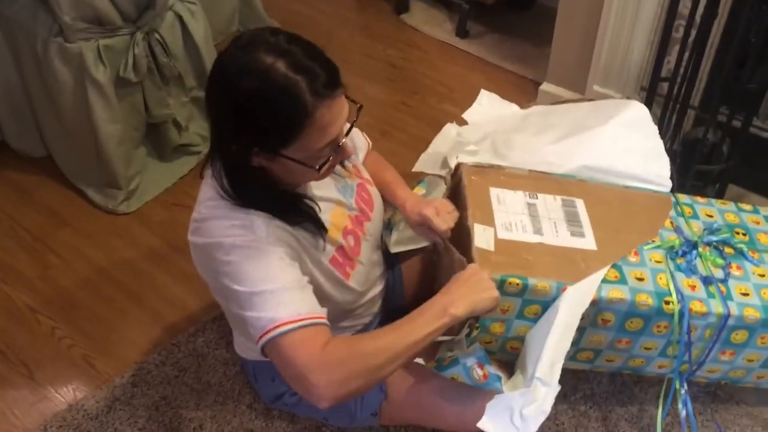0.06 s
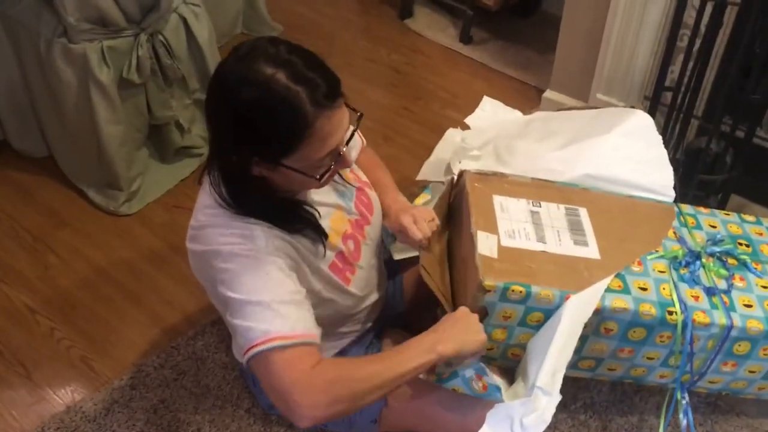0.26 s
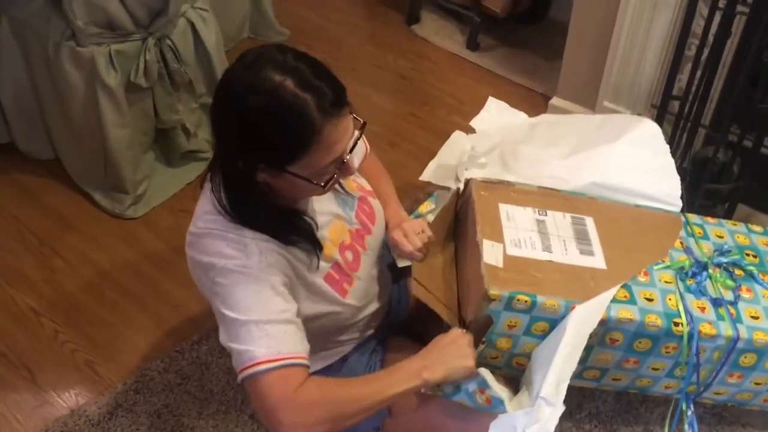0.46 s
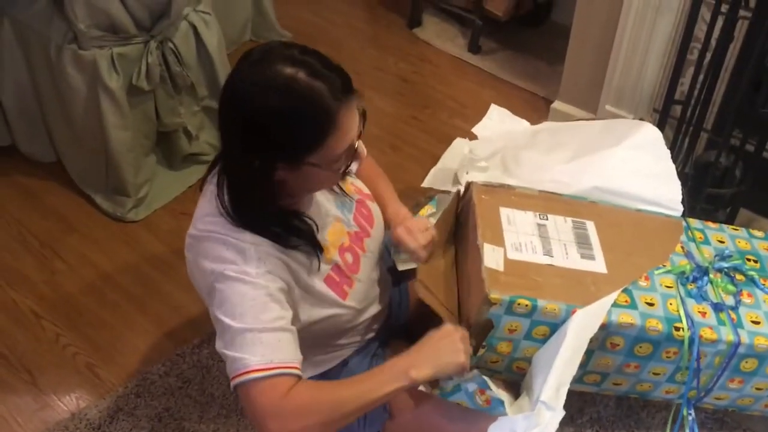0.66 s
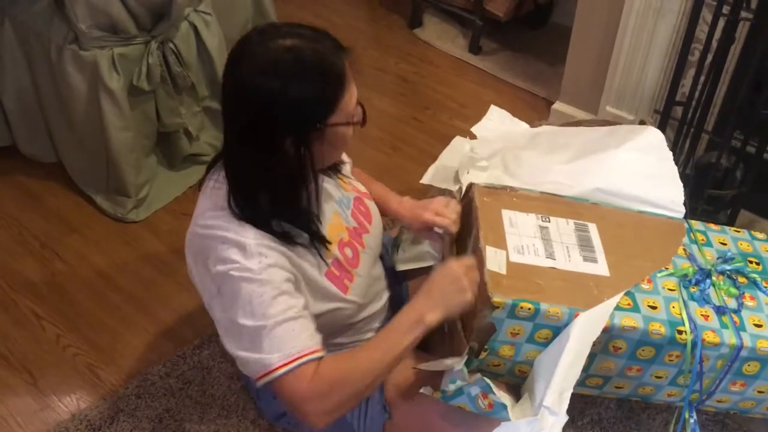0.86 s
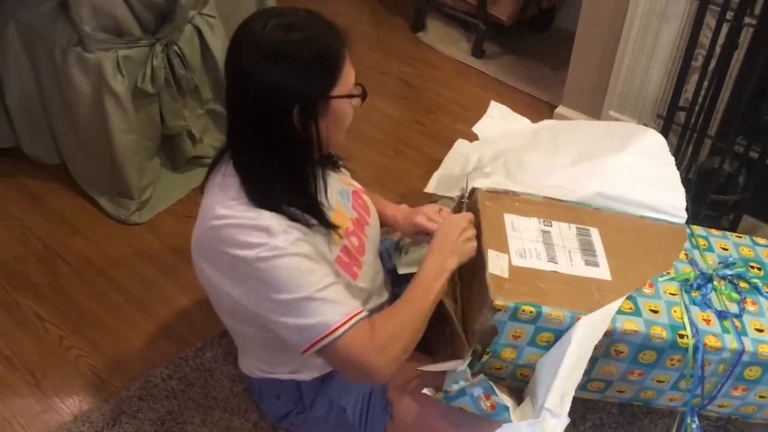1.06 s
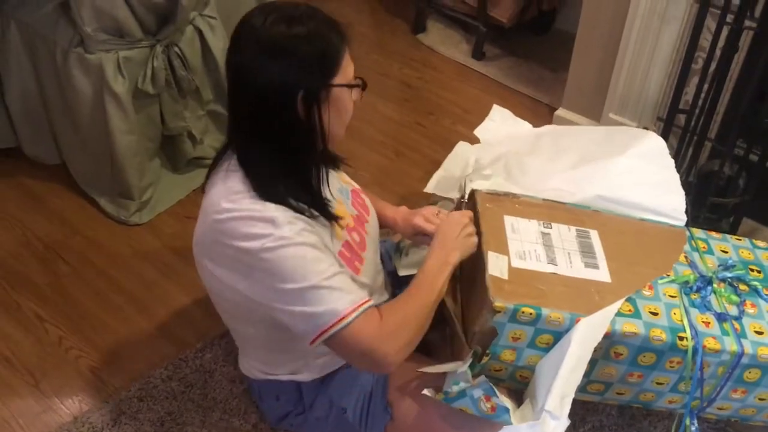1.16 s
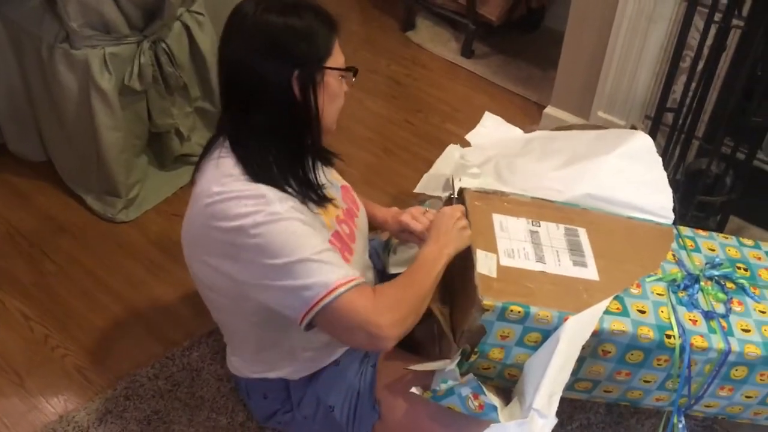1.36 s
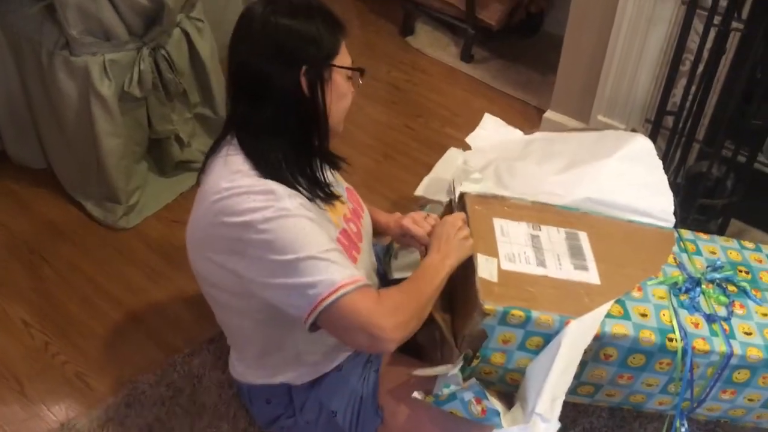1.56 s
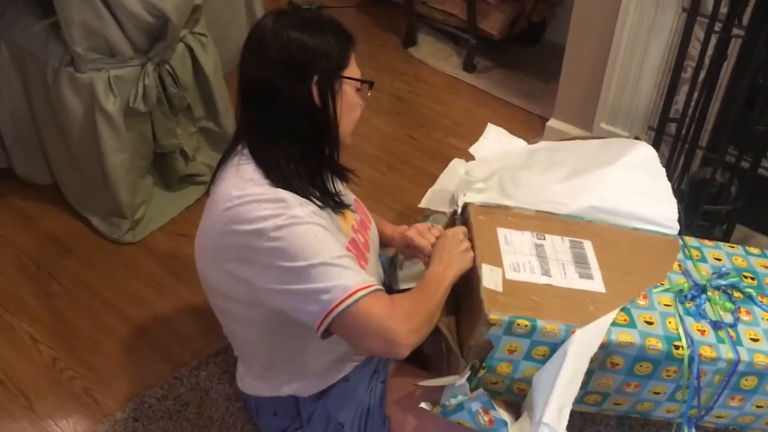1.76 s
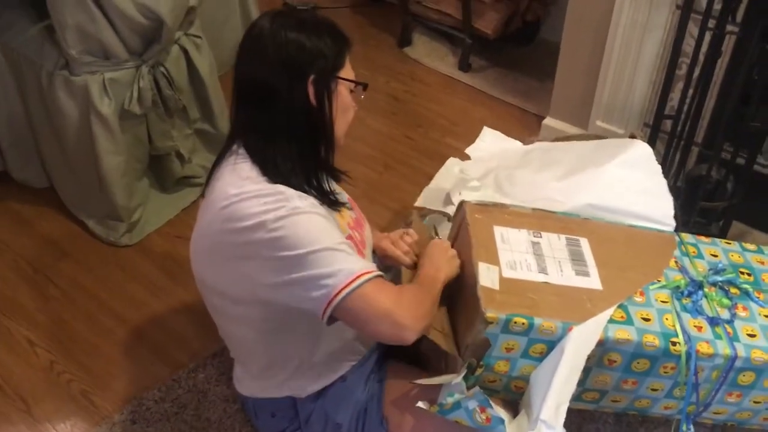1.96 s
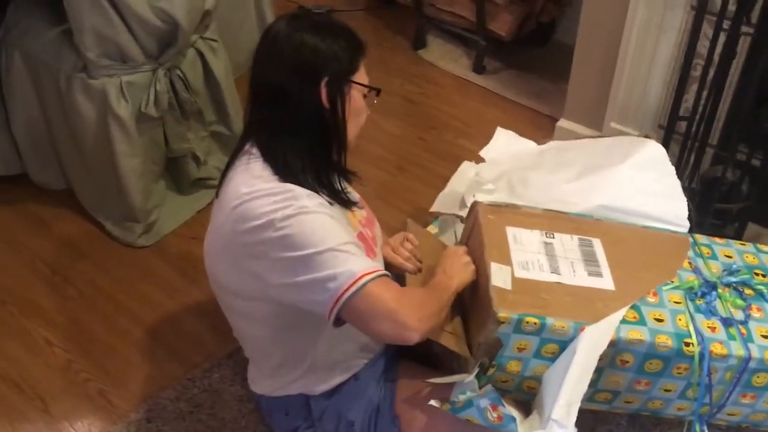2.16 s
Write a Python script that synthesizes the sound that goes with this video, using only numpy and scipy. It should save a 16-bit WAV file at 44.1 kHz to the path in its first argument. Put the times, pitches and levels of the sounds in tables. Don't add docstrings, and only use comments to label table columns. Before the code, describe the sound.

A cardboard box is pulled open indoors. Loud cracks and hollow thumps hit at 0.17-0.27 s, then a stiff flap snaps free at 0.45-0.54 s. Small paper ticks and crackles follow until 1.2 s. A hand slides faster over the board around 1.4-1.65 s, with a snap at 1.48 s. Cracks and softer knocks return at 1.83-1.93 s, then faint clicks over low hum and short room tail.

```python
import sys
import numpy as np
from scipy import signal
from scipy.fft import rfft, irfft, next_fast_len
from scipy.io import wavfile
from scipy.ndimage import uniform_filter1d, map_coordinates

SR = 44100
rng = np.random.default_rng(int(sys.argv[2]) if len(sys.argv) > 2 else 0)


def materialize(psi):
    bounded = np.clip(np.atleast_2d(psi).T, -1, 1)
    quanta = np.round(bounded * 32767).astype(np.int16)
    wavfile.write(sys.argv[1], SR, quanta)


def makeup_ratio(level_db):
    decades = np.asarray(level_db, float) / 20
    return 10 ** decades


N = 97020

# start in seconds, peak in dB, ringing pitch in Hz, broad part in dB, t60 in seconds.
CRACKS = [(.165, -13, 5500, 40, 0.021), (.1752, -6, 4000, 33, 0.031), (.1805, -26, 6540, 14, 0.016),
          (.1992, 0, 4520, 0, 0.026), (.2045, -3.5, 2950, 11, 0.0099), (.4532, -4, 3080, -1, 0.009),
          (.4598, -4.5, 5340, -2, 0.016), (.4655, -16, 3400, -26, 0.0067), (.5158, -11, 8000, -18, 0.01),
          (.5175, -6.5, 1070, -16.5, 0.013), (1.8715, -28, 4200, -3, 0.025), (.461, -17, 1120, -22, 0.036),
          (.522, -14, 2220, -12, 0.032), (.5398, -7.5, 3600, 0, 0.011), (1.4845, -4.5, 4560, -11.5, 0.0074),
          (1.4862, -6.5, 5050, -12, 0.01467), (1.4895, -27, 3700, -15, 0.017), (1.8272, -25, 4000, 7, 0.07),
          (1.8342, -5.5, 4580, -6, 0.028), (1.8503, -15, 2620, -6, 0.028), (1.862, -23, 3680, -31, 0.075),
          (1.9035, -18.5, 4770, -3, 0.061), (1.9165, -39, 5600, 5, .03)]
# start in seconds, peak in dB, ringing pitch in Hz, broad part in dB, t60 in seconds.
TICKS = [(0.028, -36, 3250, -22, 0.029), (.369, -26.5, 5440, 0, 0.012), (0.4196, -25, 9400, -11.5, 0.02),
         (0.5861, -21.5, 3800, -7, 0.013), (0.6867, -24, 1950, 18, 0.023), (0.714, -23.5, 6000, -9, .009),
         (0.7486, -25.5, 5650, -7, 0.013), (0.77, -24.5, 2010, 3, 0.011), (0.7799, -24, 6200, -13, 0.0042),
         (0.8186, -18.5, 4320, -16, 0.009), (0.8564, -28.5, 2930, -24, 0.018),
         (1.0462, -36.5, 3200, -7, 0.015), (1.0684, -31, 5470, -3, 0.034),
         (1.0732, -26.5, 2550, -20, 0.018), (1.127, -33, 4500, -10, .012), (1.17, -28, 1180, 3, 0.039),
         (1.1967, -24, 12800, -7, 0.012), (1.3657, -29.5, 6500, -8, 0.055), (0.9196, -32, 11800, 3, 0.0082),
         (1.687, -32.5, 6100, 1, .03)]
# start in seconds, peak in dB, ringing pitch in Hz, broad part in dB,
# t60 in seconds.
LATE_TICKS = [(1.7228, -27, 6000, -9, .01), (1.7512, -36, 6000, -6, .006),
              (1.7602, -30, 6000, -1, .007), (2.057, -31, 3000, -12, .01),
              (2.0612, -33, 5000, -14, .008), (2.1015, -32, 4500, -7, .008),
              (2.138, -33, 9000, -4, .006), (2.1533, -27, 4300, -5, .007),
              (2.1595, -30, 6000, -10, .02)]
# start in seconds, peak in dB, ringing pitch in Hz, broad
# part in dB, t60 in seconds.
CRACKLES = [(.0857, -36.5, 9000, -11, 0.0085), (0.292, -27, 11000, -6, .01),
            (0.4464, -24.5, 12000, 6, 0.0095), (.525, -25, 10000, -8, 0.014), (0.614, -27, 3670, -6, 0.01),
            (.7205, -34, 5980, -11, 0.0064), (.7755, -22, 6500, -3, 0.012), (.793, -35, 6200, -10, 0.0092),
            (.83, -32, 5000, -7, 0.0062), (0.841, -25.5, 8600, -17, 0.017), (.846, -28, 7000, -8, 0.0073),
            (0.8538, -23, 8500, -17, 0.0079), (.8605, -32.5, 13500, -6, 0.0063),
            (.864, -33, 6000, -13, 0.0043), (1.027, -45, 3000, -22, 0.01), (1.0302, -43, 3300, -16, 0.014),
            (1.041, -40.5, 3200, -11, 0.018), (1.064, -39, 6500, -6, 0.012),
            (1.0765, -33.5, 1520, -9, 0.024), (1.088, -35, 7000, -4, 0.0085),
            (1.124, -35, 6000, -14, 0.0097), (1.131, -37, 3400, -21, 0.013),
            (1.1368, -30, 4000, -5, 0.0072), (1.162, -34.5, 3980, -4, 0.0074),
            (1.1775, -23.5, 12000, -14, 0.0095), (1.184, -32.5, 6000, 7, 0.011),
            (1.2005, -27, 6940, -27, 0.016), (1.7522, -26.5, 10800, -21, 0.014),
            (1.7608, -29, 12200, -21, 0.0071), (1.978, -43, 11500, -14, 0.0058),
            (2.136, -31.5, 1720, -7, 0.0092), (1.8409, -6, 5000, 13, 0.0153)]
# frequency in Hz, gain in dB.
SNAP_TONE = [(150, -43.5), (450, -3), (800, 4), (3000, 6.5), (9000, 2.5), (15000, -4.5)]
RING_OCTAVES, LUMPS_DB = 0.3, 2.5
RISE_SHARE = 0.038
FIRST_FIBRE = 3

# time in seconds, level in dB, share of dull board scrape in dB.
RUB = [(0, -50.5, 1), (0.059, -59, -3.5), (.34, -56, 3.5), (.44, -53.5, -6), (0.556, -51.5, 5.5),
       (.66, -54.5, -6), (.76, -43.5, -20), (0.863, -45.5, -19), (.89, -54, -10), (1.01, -65, -4.5),
       (1.19, -58, -7), (1.353, -57.5, -5), (1.369, -50, -6.5), (1.461, -41, -5), (1.578, -38, -10),
       (1.68, -55.5, -11), (1.8, -61.5, -1.5), (1.885, -44.5, -3.5)]
# frequency in Hz, density in dB per Hz.
PAPER_TONE = [(300, -27), (600, -31), (1500, -10), (2300, -6), (4200, 0), (6000, 0), (10000, -1.5),
              (14500, -7)]
# frequency in Hz, density in dB per Hz.
BOARD_TONE = [(100, -2.5), (250, 8), (600, 4), (1500, 0), (2300, -2.5), (6000, -24)]
# frequency in Hz, density in dB per Hz.
SLOW_SLIDE_TONE = [(600, -33), (1500, -8), (2250, -13), (3100, -5.5), (5800, 0), (8500, -3), (11000, -19),
                   (14500, -7)]
# frequency in Hz, density in dB per Hz.
FAST_SLIDE_TONE = [(600, -35), (1500, -4.5), (2700, -5.5), (4400, 4), (5100, 1.5), (5900, 0), (9000, -4),
                   (15000, -14)]
SLIDE_FROM_S, SPEEDS_UP_S, SLIDE_TO_S, BLEND_S = 1.35, 1.48, 1.7, 0.022
GRAINS_PER_S, GRAIN_SPREAD_DB, GRAIN_DB = 1200, 3.5, -3
UNEVEN_DB = 1.3
RUB_FADE_S, RUB_FADE_DB_PER_S = 1.883, 93

# start in seconds, level in dB, pitch in Hz the struck spot favours.
KNOCKS = [(0.167, -27, 183), (0.178, -19, 260), (.2, -19.5, 505), (0.204, -18, 420), (0.221, -18, 141),
          (.252, -20.5, 167), (0.267, -30, 151), (0.496, -24.5, 132), (0.521, -34, 254), (1.171, -43, 205),
          (1.839, -38, 128), (1.846, -24.5, 223), (1.866, -25, 80), (1.917, -35.5, 129), (1.934, -40, 90)]
# frequency in Hz, level in dB, t60 in seconds.
BOX_MODES = [(61, 0.5, 0.041), (154.7, -11, 0.14), (212, -3.5, 0.062), (353, 2.5, 0.018),
             (565, -3.5, 0.057), (785, -1, 0.058), (997, 1, 0.036)]
SPOT_OCTAVES, PUSH_CYCLES = 0.97, 0.18

# start in seconds, level in dB.
FLAP_BLOWS = [
    (.4535, -21),
    (.4603, -15.5),
    (.4655, -27.5),
]
# frequency in Hz, level in dB, t60 in seconds.
FLAP_MODES = [(688.5, -10.5, 0.1), (1066, -12.5, 0.034), (1160, -17, 0.079), (1437, -4, 0.047),
              (2010, -4, 0.082), (2136, 4.5, 0.027), (2454, -6.5, 0.041), (3400, -2, .02)]
# start in seconds, level in dB, pitch in Hz, t60 in seconds.
THUMPS = [
    (.202, -14, 374, 0.049),
    (0.216, -26, 134, .1),
    (1.833, -29.5, 111.1, .06),
    (1.842, -33, 1000, 0.091),
    (1.875, -33, 306, 0.07),
]

# frequency in Hz, t60 in seconds.
ROOM_DECAY = [(150, 0.34), (1000, 0.3), (5000, 0.27), (14000, 0.24)]
ROOM_DB, PREDELAY_S = -7.5, 0.004
BOX_WET_DB, SCATTER_PER_S = -3, 300

# frequency in Hz, density in dB per Hz.
AIR_TONE = [(15, -31), (30, -37.5), (240, 7), (450, -9.5), (1800, -49), (3200, -4.5), (6000, -74),
            (15800, -11)]
AIR_DB = -60.5
# frequency in Hz, rms level in dB.
HUM = [(120, -70), (240, -62.5), (480, -73.5)]

# frequency in Hz, gain in dB.
MIC = [(22, -19.5), (52, 2.5), (4800, -1), (6100, 5), (7600, -4.5), (10600, -8), (12500, -5), (15500, -7)]
NOTCH_HZ, NOTCH_WIDTH_HZ, NOTCH_SHARE = 10500, 110, 0.4
TOP_HZ, EDGE_HZ, OPENS_DB = 15800, 60, -30


def unit(x):
    return x / np.sqrt(np.mean(x ** 2) + 1e-20)


def along(points, hz):
    f, v = np.transpose(points)
    return np.interp(np.log(hz + 1), np.log(f + 1), v)


def wobble(rate):
    return map_coordinates(rng.standard_normal(2000), [np.arange(N) * rate / SR])


def after(s):
    return np.clip((np.arange(N) / SR - s) / BLEND_S + 0.5, 0, 1)


def add(out, s, sound):
    part = out[round(s * SR):][:len(sound)]
    part += sound[:len(part)]


def coloured(x, points, ring_hz=None, broad_db=0):
    m = 2 * next_fast_len(x.shape[-1] // 2 + 1024)
    hz = np.fft.rfftfreq(m, 1 / SR)
    gain = makeup_ratio(along(points, hz) + broad_db)
    if ring_hz:
        octaves = np.log2((hz + 1) / ring_hz)
        gain = gain + np.exp(-0.5 * (octaves / RING_OCTAVES) ** 2)
    cep = irfft(np.log(gain), m)
    cep[1:m // 2] *= 2
    cep[m // 2 + 1:] = 0
    return irfft(rfft(x, m) * np.exp(rfft(cep)), m)[..., :x.shape[-1]]


def snaps(rows):
    out, t = np.zeros(N), np.arange(SR // 10) / SR
    for s, db, ring_hz, broad_db, t60 in rows:
        rise_s, decay_s = RISE_SHARE * t60, max(t60, 0.002)
        lumps = makeup_ratio(LUMPS_DB * unit(uniform_filter1d(rng.standard_normal(len(t)), size=24)))
        envelope = makeup_ratio(-60 * t / decay_s) * (1 - np.exp(-t / rise_s))
        burst = rng.standard_normal(len(t)) * lumps * envelope
        burst[round(2 * rise_s * SR)] = -FIRST_FIBRE
        burst = coloured(burst, SNAP_TONE, ring_hz, broad_db)
        loudness = np.sqrt(np.sum(burst ** 2) / (SR * decay_s / 14))
        add(out, s, makeup_ratio(db - 9.5) * burst / loudness)
    return out


def rubbing():
    t = np.arange(N) / SR
    s, level, dull = np.transpose(RUB)
    level_db, dull_db = np.interp(t, s, level), np.interp(t, s, dull)
    level_db = level_db - np.clip(RUB_FADE_DB_PER_S * (t - RUB_FADE_S), 0, 16)

    chance = rng.random(N)
    size_db = np.minimum(rng.exponential(1, N) * GRAIN_SPREAD_DB, 14)
    caught = chance < GRAINS_PER_S / SR * makeup_ratio(5 * wobble(40))
    grains = caught * makeup_ratio(size_db) * rng.standard_normal(N)
    hiss = rng.standard_normal(N) * makeup_ratio(UNEVEN_DB * wobble(59.9))
    friction = hiss + makeup_ratio(GRAIN_DB) * unit(grains)

    sheet = unit(coloured(friction, PAPER_TONE))
    slow = unit(coloured(friction, SLOW_SLIDE_TONE))
    fast = unit(coloured(friction, FAST_SLIDE_TONE))
    slide = slow + after(SPEEDS_UP_S) * (fast - slow)
    paper = sheet + (after(SLIDE_FROM_S) - after(SLIDE_TO_S)) * (slide - sheet)
    board = unit(coloured(rng.standard_normal(N) * makeup_ratio(2.1 * wobble(90)), BOARD_TONE))
    hand = makeup_ratio(level_db + UNEVEN_DB * wobble(14.6))
    return hand * (paper + makeup_ratio(dull_db + UNEVEN_DB * wobble(33.25)) * board)


def box():
    out, t = np.zeros(N), np.arange(SR // 2) / SR
    for s, db, spot_hz in KNOCKS:
        ring = np.zeros(len(t))
        for hz, level, t60 in BOX_MODES:
            reach = np.exp(-0.5 * (np.log2(hz / spot_hz) / SPOT_OCTAVES) ** 2)
            bent_hz = hz * (1 + rng.normal(0, 1) / 40)
            ring += makeup_ratio(level - 60 * t / t60) * reach * np.sin(2 * np.pi * bent_hz * t)
        push = 1 - np.exp(-t * spot_hz / PUSH_CYCLES)
        add(out, s, -makeup_ratio(db) * ring * push)
    return out


def struck(s, db, modes):
    out, t = np.zeros(N), np.arange(SR // 4) / SR
    for hz, level, t60 in modes:
        envelope = makeup_ratio(db + level - 60 * t / t60) * (1 - np.exp(-t * hz))
        add(out, s, envelope * np.sin(2 * np.pi * hz * t))
    return out


def panels():
    flap = sum(struck(s, db, FLAP_MODES) for s, db in FLAP_BLOWS)
    sides = sum(struck(s, db, [(hz, 0, t60)]) for s, db, hz, t60 in THUMPS)
    return flap + sides


def room(x):
    out, hop = np.zeros(N), SR // 8
    for k in range(0, N, hop):
        hz, t, z = signal.stft(rng.standard_normal(SR // 2), SR, nperseg=256)
        decay = makeup_ratio(-60 * t / along(ROOM_DECAY, hz)[:, None])
        tail = signal.istft(z * decay, SR, nperseg=256)[1]
        answer = signal.fftconvolve(x[k:k + hop], tail / np.linalg.norm(tail))
        add(out, k / SR + PREDELAY_S, answer)
    return out


def air():
    t, hum = np.arange(N) / SR, np.zeros(N)
    for hz, db in HUM:
        hum += np.sqrt(2) * makeup_ratio(db + 1.4 * wobble(5.8)) * np.sin(2 * np.pi * (hz * t + rng.random()))
    rumble_tone = [(20, 14.5), (55, 4.0), (90, 1.5), (200, -1), (400, -50.0)]  # Hz, dB per Hz
    rumble = unit(coloured(rng.standard_normal(N), rumble_tone))
    tone = unit(coloured(rng.standard_normal(N), AIR_TONE))
    return makeup_ratio(AIR_DB) * tone + makeup_ratio(-55 + 7.5 * wobble(6.63)) * rumble + hum


def below(x, top_hz, notch_share=0):
    hz = np.fft.rfftfreq(N, 1 / SR)
    dip = 1 - np.clip(notch_share, 0, 1) * np.exp(-((hz - NOTCH_HZ) / NOTCH_WIDTH_HZ) ** 2)
    edge = 1 + np.exp(np.clip((hz - top_hz) / EDGE_HZ, -50, 50))
    return irfft(rfft(x) * dip / edge, N)


def scene():
    paper = rubbing() + snaps(CRACKS + TICKS + LATE_TICKS + CRACKLES)
    knocks = box() + panels()
    to_walls = paper + makeup_ratio(BOX_WET_DB) * knocks * wobble(SCATTER_PER_S)
    mix = paper + knocks + makeup_ratio(ROOM_DB) * room(to_walls) + air()
    return np.tile(mix, (2, 1))


def top_cut(x):
    return signal.sosfilt(signal.butter(12, 16990, fs=SR, output="sos"), x)


def record(dry):
    heard = below(coloured(dry, MIC), TOP_HZ + 1000, NOTCH_SHARE)
    band = below(heard, TOP_HZ)
    treble = np.abs(heard - below(heard, 12000))
    loud = 1.0 * (treble > makeup_ratio(OPENS_DB))
    opened = np.clip(uniform_filter1d(loud, size=256) * 40, 0, 1)
    return top_cut(band + opened * (heard - band))


dry = scene()
out = record(dry)
materialize(out)
```